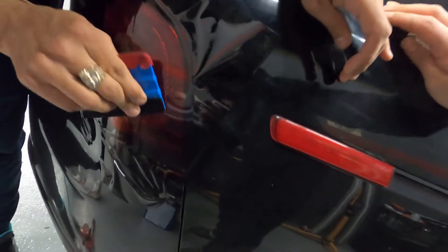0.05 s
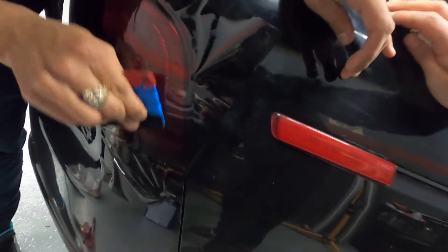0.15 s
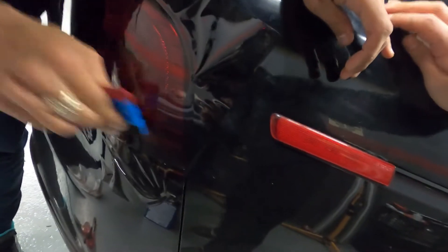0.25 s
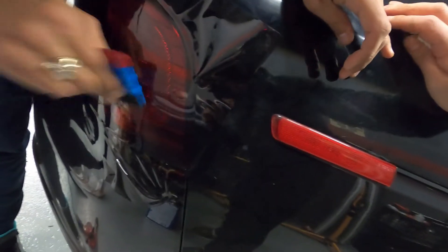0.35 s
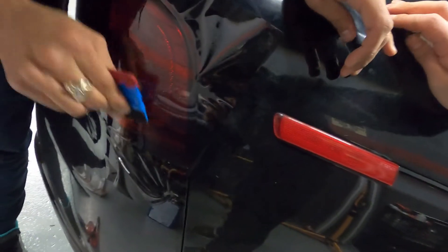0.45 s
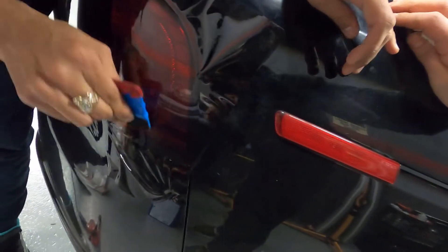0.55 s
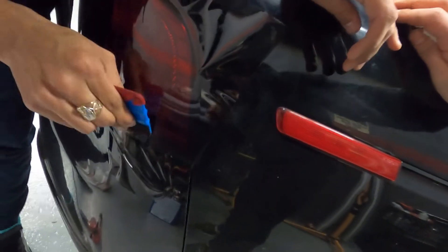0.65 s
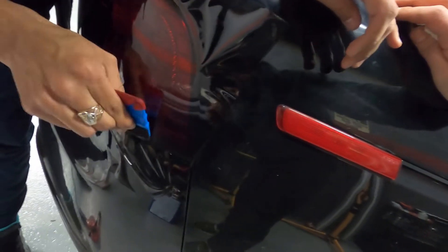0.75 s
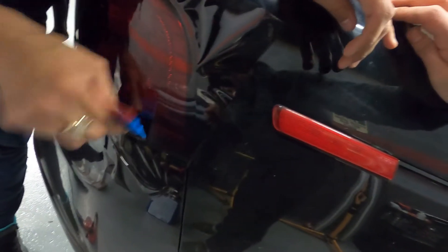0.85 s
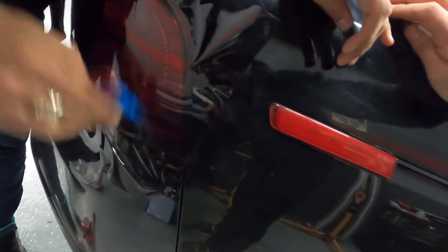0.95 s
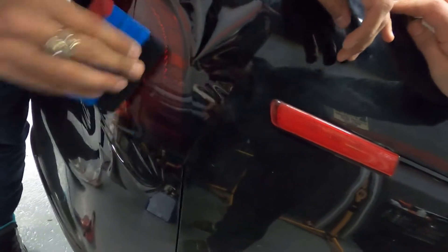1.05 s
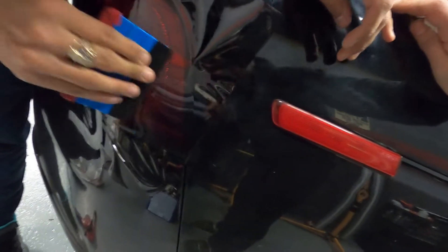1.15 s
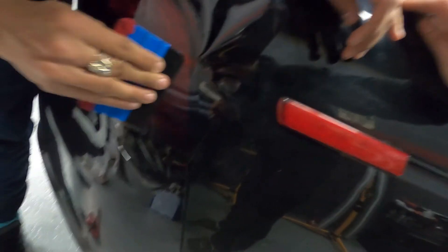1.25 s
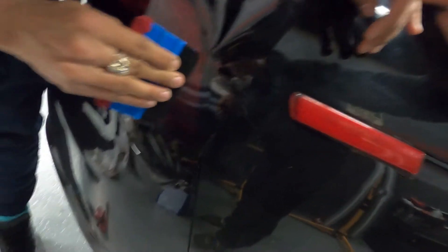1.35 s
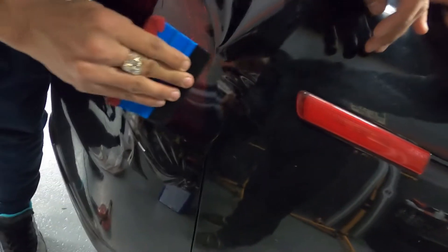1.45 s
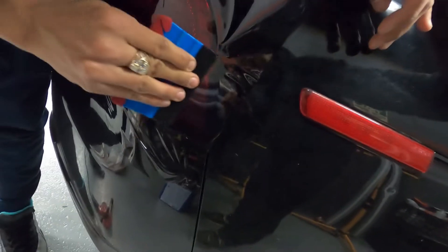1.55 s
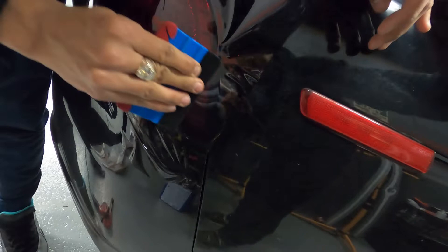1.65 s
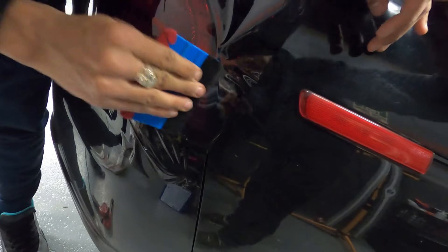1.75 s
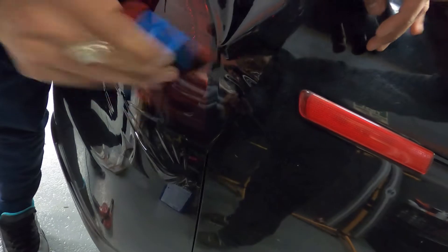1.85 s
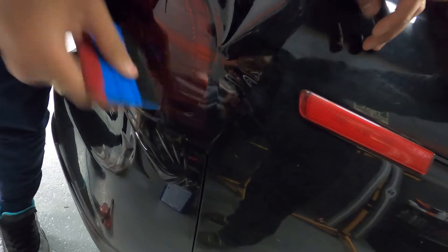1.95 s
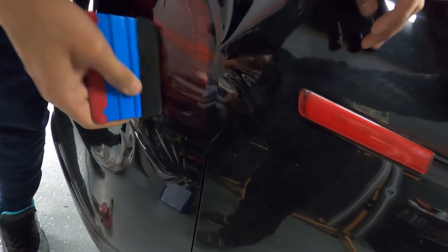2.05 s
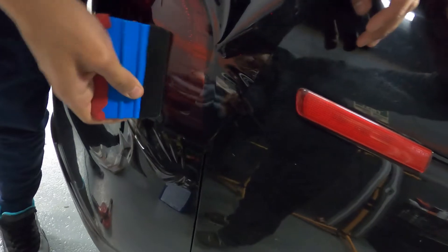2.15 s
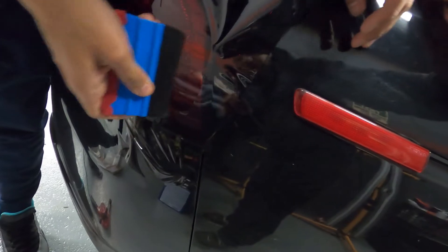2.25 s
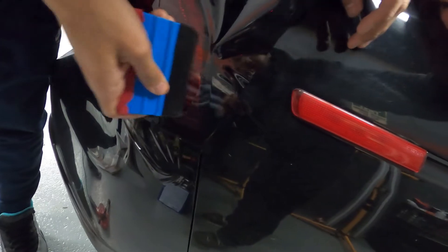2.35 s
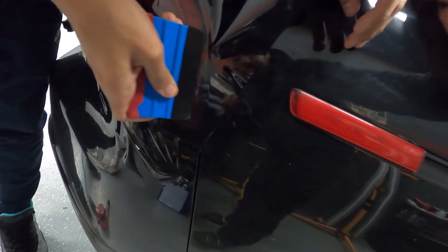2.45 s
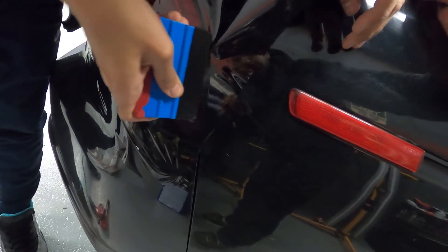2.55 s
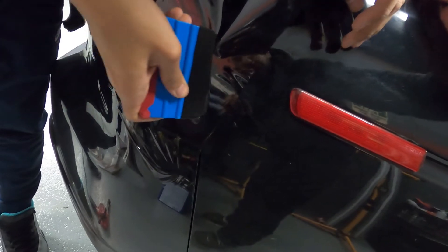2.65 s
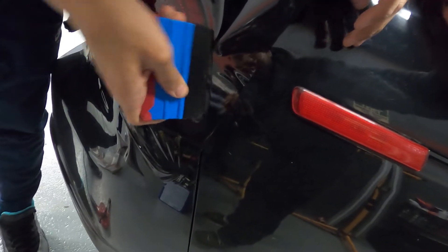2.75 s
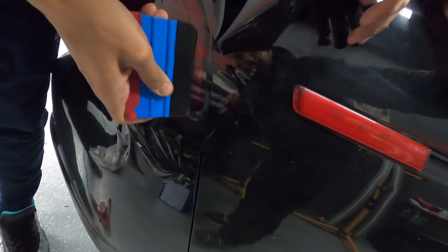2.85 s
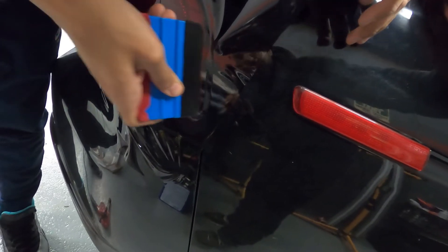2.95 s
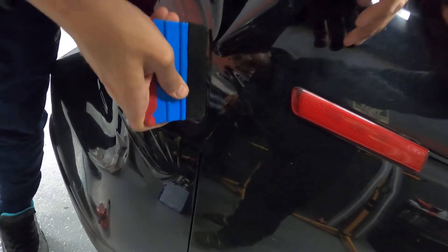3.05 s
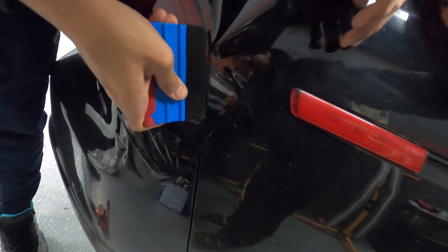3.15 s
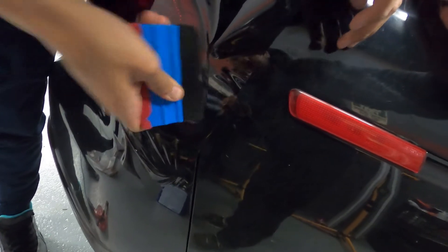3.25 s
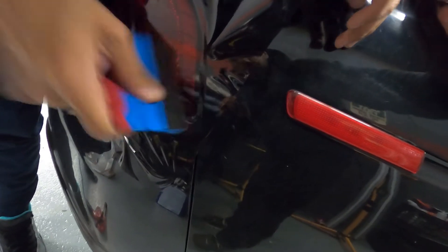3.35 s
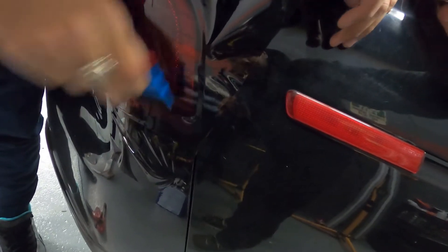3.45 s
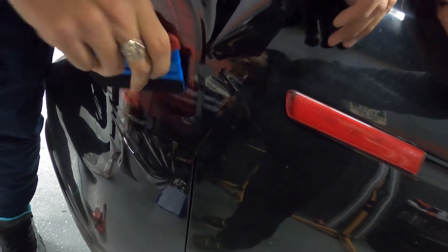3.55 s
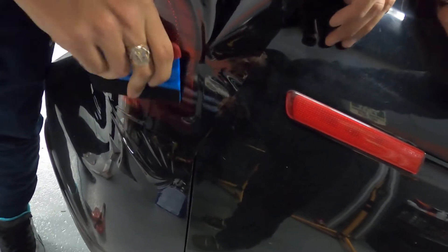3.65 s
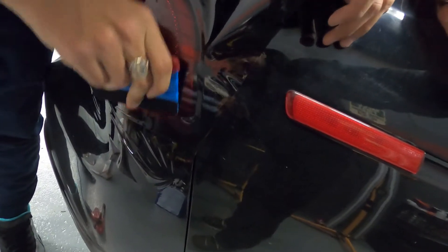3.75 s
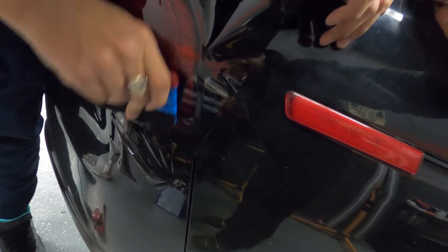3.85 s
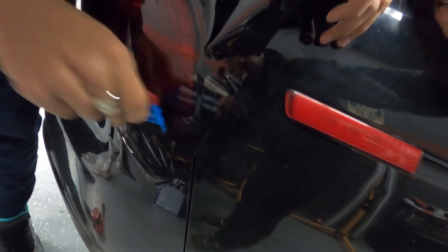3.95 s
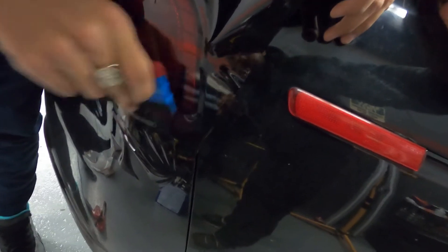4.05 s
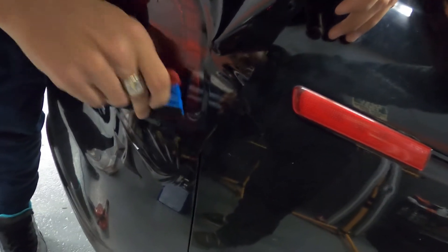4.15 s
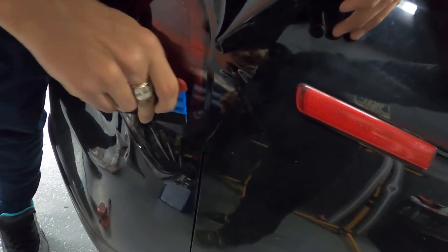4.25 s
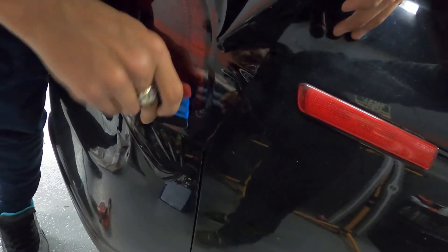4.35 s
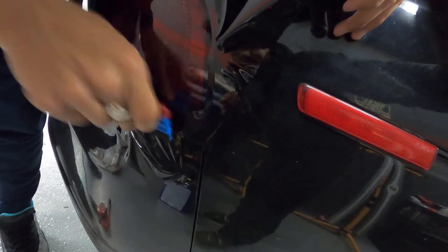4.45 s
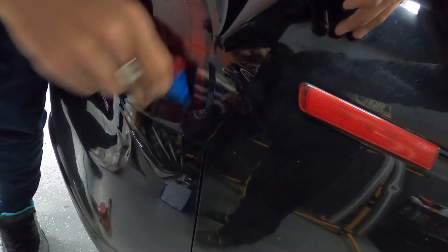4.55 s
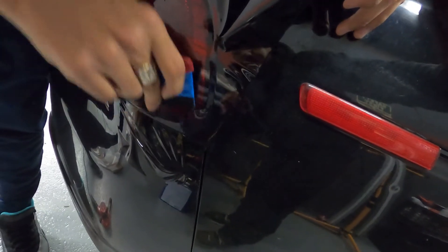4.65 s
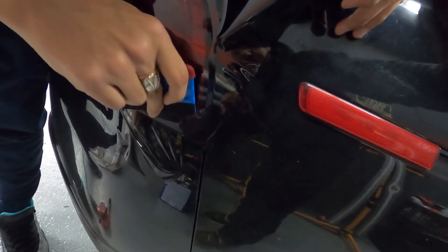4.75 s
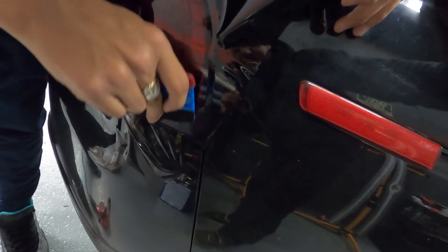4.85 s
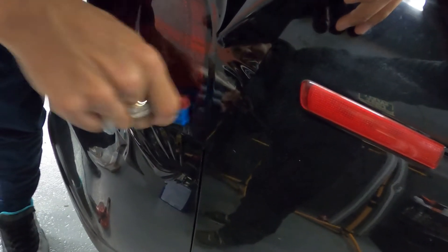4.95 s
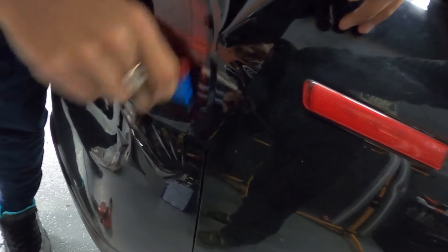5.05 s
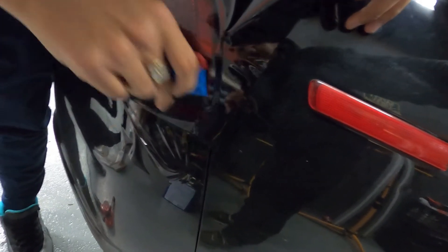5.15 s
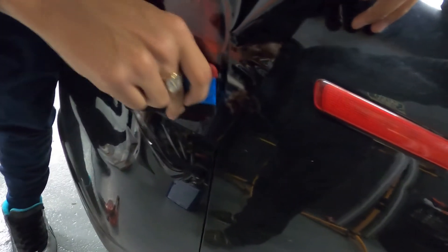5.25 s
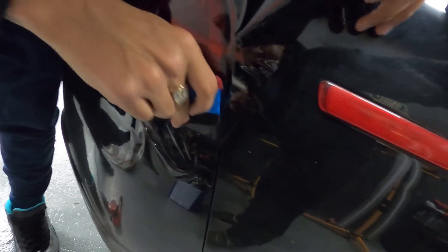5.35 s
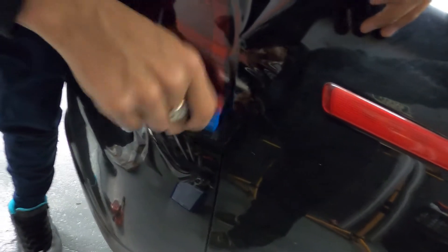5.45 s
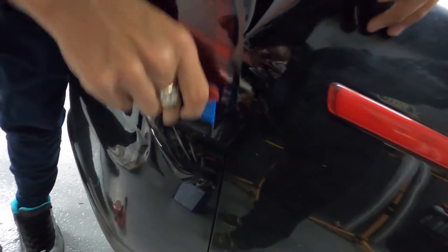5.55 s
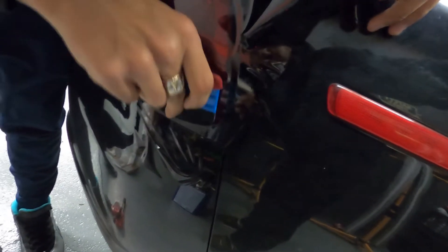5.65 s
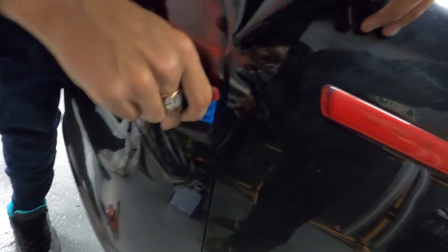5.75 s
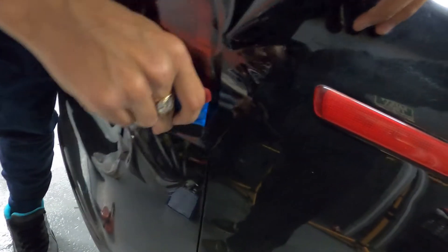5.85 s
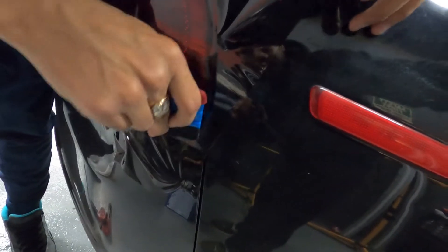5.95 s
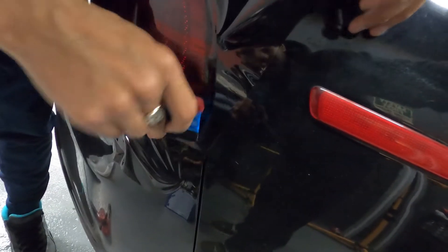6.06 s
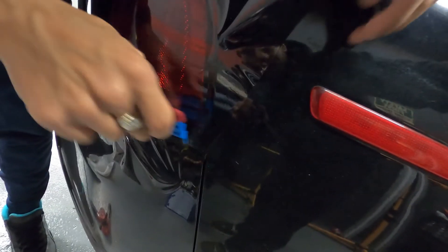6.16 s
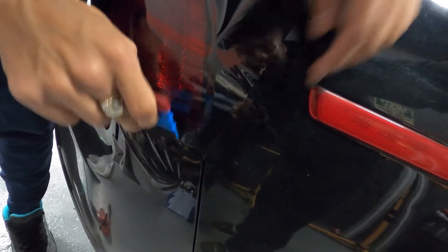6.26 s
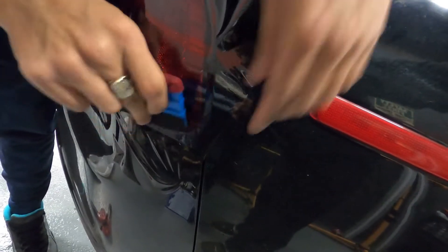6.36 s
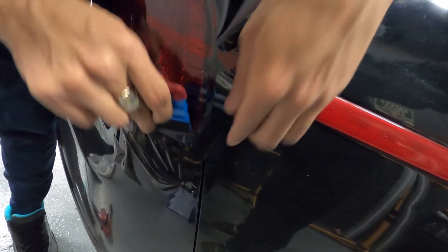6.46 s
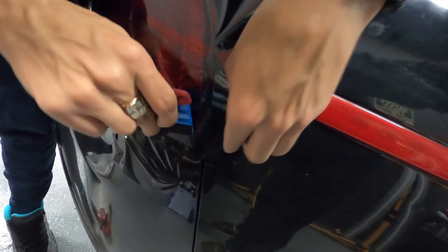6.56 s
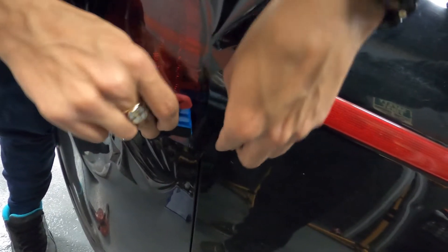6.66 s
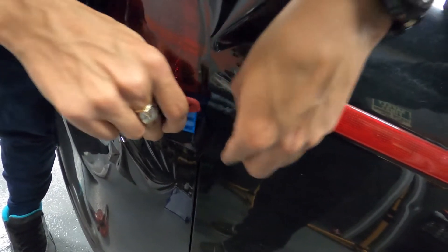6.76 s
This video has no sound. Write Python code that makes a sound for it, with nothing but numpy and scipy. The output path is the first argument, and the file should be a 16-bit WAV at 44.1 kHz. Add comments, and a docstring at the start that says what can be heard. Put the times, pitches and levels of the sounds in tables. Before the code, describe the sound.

Irregular knocks on a hollow car lamp start immediately, with a loud one at half a second. Faint felt strokes, cloth rustle and light ticking follow, then more separated medium knocks. The last stretch is loudest, with two hard, bright snapping cracks and a busy scrape and clatter before settling. Close stereo pickup in a quiet garage, with low hum, soft body bumps and little reverberation.

```python
"""Knocks at once, then scattered knocks, ticks, snaps and strokes over almost seven seconds of low room hum.
A squeegee blade works vinyl film on a car lamp in a quiet garage, close to the ports of a two-port camera.
Knocks, thumps and film snaps are struck modes; a slipping blade judders; strokes rub, swish and hiss,
a sleeve rustles and the hands bump the car body, all as coloured noise under swelling levels.
A sparse-tap tail gives the garage."""
import sys
import numpy as np
from scipy import signal
from scipy.fft import rfft, irfft, next_fast_len
from scipy.io import wavfile
from scipy.ndimage import uniform_filter1d

SR = 44100
rng = np.random.default_rng(int(sys.argv[2]) if len(sys.argv) > 2 else 0)


def undo_db(level):
    """Turn decibels back into plain size, where 20 dB means ten times bigger."""
    steps = np.asarray(level, float) / 20
    return 10 ** steps


def to_wav(s):
    """Save 16-bit WAV."""
    ch = np.atleast_2d(s).T  # columns
    pcm = np.round(np.clip(ch, -1, 1) * 32767)  # PCM
    wavfile.write(sys.argv[1], SR, pcm.astype(np.int16))


N = 299649

# Spectra of the noise layers; only the shape counts: pitch_hz, density_db (relative, per Hz)
HUM_SPECTRUM = [(47, -58.5), (80, -51), (140, -2.5), (232, 2.5), (270, -6.5), (311, -4.5), (373, -14.5),
                (565, -21.5), (900, -32), (1170, -25), (1980, -120)]
RUMBLE_SPECTRUM = [(15, -15), (30, 2), (65, -1), (105, -12), (150, -45)]
RUB_SPECTRUM = [(240, -33.5), (400, -6.5), (524, -26), (607, -10.5), (681, -26), (1050, -7), (1500, -9),
                (2000, -13.5), (2600, -38.5), (4400, -120)]
SWISH_SPECTRUM = [(1200, -28), (1700, -3.5), (2000, -6), (2700, -6), (3500, -10.5), (5000, -17),
                  (8000, -23.5), (14000, -52)]
HISS_SPECTRUM = [(2200, -29), (3000, -10), (3500, -8.5), (4000, -6.5), (4400, -5.5), (4800, -7.5),
                 (5500, -17.5), (7000, -20), (12000, -47), (16000, -52)]
RUSTLE_SPECTRUM = [(2500, -29.5), (4000, -16.5), (5200, -1.5), (6500, 1.5), (7500, 1.5), (8800, -7),
                   (10500, -10.5), (13000, -15.5), (16000, -37.5)]
PANEL_SPECTRUM = [(200, -40), (350, -3), (500, 0), (700, -4), (1100, -40)]
# Left-right likeness of diffuse sound at the two ports: pitch_hz, likeness (0 to 1)
PORT_LIKENESS = [(60, 0.28), (180, 0.34), (550, 0.09), (1650, 0.79), (4970, 0.32), (15000, 0.18)]

# Drift of the hum in the room: time_s, level_db
HUM_DRIFT = [(0, -63), (1.05, -60), (1.4, -62), (1.65, -68), (2.1, -66), (2.25, -60), (2.65, -65),
             (2.9, -60), (3.2, -64), (3.45, -60), (4.0, -65), (4.6, -62), (5.1, -66), (6.79, -65)]
# Bumps of the hands through the car body: crest_s, level_db
HAND_BUMPS = [(0.075, -50), (0.4, -59), (0.52, -52), (0.69, -66), (0.87, -68), (1.13, -66), (1.47, -71),
              (2.0, -65), (2.2, -64), (2.42, -58), (2.5, -59), (2.68, -65), (2.91, -65), (3.14, -61),
              (3.27, -68), (3.52, -54), (3.62, -62), (4.17, -68), (4.35, -66), (4.56, -55), (4.8, -60),
              (4.9, -66), (5.87, -67), (6.235, -50), (6.405, -42), (6.445, -43), (6.56, -47)]
# Strokes of the blade, rise and fade being times for 20 dB:
# crest_s, rise_s, fade_s, lens_rub_db, felt_swish_db, edge_hiss_db
BLADE_STROKES = [(0.04, .03, .2, -50, -59, -59), (0.28, .3, .3, -65, -59, -82),
                 (0.55, .37, .2, -57, -50, -56), (0.84, .3, .3, -71, -67, -73),
                 (1.04, .15, .1, -70, -71, -72), (1.19, .12, .1, -74, -69, -75),
                 (1.36, .2, .3, -72, -69, -88), (1.5, .1, .25, -66, -70, -90),
                 (1.82, .2, .2, -74, -76, -72), (2.02, .15, .2, -74, -70, -73),
                 (2.14, .1, .18, -66, -66, -67), (2.33, .12, .2, -62, -65, -71),
                 (2.49, .2, .25, -62, -70, -70), (2.72, .25, .1, -70, -68, -75),
                 (2.9, .15, .15, -77, -76, -75), (3.1, .3, .1, -72, -74, -79),
                 (3.41, .15, .25, -70, -62, -69), (3.86, .3, .3, -75, -71, -71),
                 (4.03, .12, .12, -82, -79, -73), (4.33, .1, .3, -72, -72, -84),
                 (4.83, .1, .15, -75, -70, -75), (5.02, .15, .15, -75, -77, -76),
                 (5.33, .1, .3, -65, -72, -74), (5.48, .1, .08, -65, -77, -79),
                 (5.67, .1, .38, -53, -58, -46), (6.33, .12, .25, -54, -54, -44),
                 (6.49, .2, .12, -49, -47, -46), (6.55, .06, .07, -60, -54, -60),
                 (6.7, .2, .3, -73, -70, -63)]
# Rustles of the sleeve: crest_s, level_db, time_s for 20 dB up and again down
SLEEVE_RUSTLES = [(0.05, -69, .2), (0.52, -63, .35), (0.85, -75, .25), (1.03, -76, .15), (1.19, -70, .15),
                  (1.33, -72, .2), (1.5, -74, .25), (1.81, -73, .2), (1.91, -70, .1), (2.02, -65, .08),
                  (2.14, -62, .15), (2.3, -71, .2), (2.48, -69, .3), (2.72, -70, .12), (2.92, -74, .15),
                  (3.07, -75, .1), (3.14, -72, .06), (3.43, -66, .2), (3.74, -75, .15), (3.89, -73, .2),
                  (4.03, -70, .12), (4.25, -76, .1), (4.37, -72, .12), (4.54, -74, .1), (4.82, -80, .12),
                  (5.01, -72, .08), (5.07, -70, .1), (5.31, -75, .15), (5.44, -76, .1), (5.68, -56, .11),
                  (5.82, -66, .12), (6.32, -55, .2), (6.49, -51, .1), (6.72, -73, .25)]

# Knocks on the lamp: start_s, peak_db, thump_db, hardness_db (per octave),
# ring_hz (housing modes near it ring on), thump_hz (cavity modes near it are favoured)
LAMP_BLOWS = [(0.021, -22, -27, -9, 750, 390), (0.024, -19.5, -29.5, -6, 1330, 91.4),
              (0.032, -23.5, -25, -9.5, 900, 280), (0.5076, -9, -27.5, -4.5, 1100, 190),
              (1.228, -8.5, -26.5, -5, 950, 253), (2.111, -40, -34.5, -17.5, 500, 218),
              (2.246, -50, -41, -4, 1100, 237), (3.49, -24.5, -33.5, -21, 1000, 169),
              (3.676, -20.5, -30, -13, 1177, 209), (4.239, -14.5, -25.5, -6, 1280, 203),
              (4.548, -65, -50, -8.5, 997, 148), (4.726, -15.5, -26, -10, 1200, 196),
              (5.228, -17.5, -35.5, -3.5, 1296, 178), (5.2293, -15, -28.5, -13, 960, 204),
              (5.581, -9.5, -30, -5, 1350, 180), (5.754, -22.5, -28.5, -9, 1500, 212),
              (6.22, -17.5, -33, -1.5, 1100, 215), (6.393, -18.5, -36.5, -2.5, 1050, 219),
              (6.543, -13, -47.5, -6.5, 1055, 306), (6.606, -39, -50.5, -8, 940, 300)]
# Light ticks on the lens, thumping only softly: start_s, peak_db, ring_hz
LENS_TICKS = [(0.916, -47.5, 940), (2.394, -42, 1360), (2.416, -43, 1000), (2.438, -39, 1300),
              (2.483, -39, 1320), (2.507, -38, 1120), (2.621, -35, 1350), (2.643, -34, 1400),
              (2.66, -47, 1250), (2.678, -50, 1190), (2.736, -50, 1400), (2.832, -47, 1550),
              (6.361, -36, 1300), (6.443, -37, 1520), (6.532, -29, 1214)]
# Quick modes of the lens: pitch_hz, level_db (relative)
LENS_MODES = [(520, -8), (700, -8), (890, 2), (1100, -1), (1340, 0.5), (1550, -1), (1780, 1.5), (2250, 3),
              (2700, 8), (3500, 10), (4600, 9.5), (6200, 6), (8000, 6.5)]
# Slow modes of the lamp housing: pitch_hz, level_db (relative), t60_s
HOUSING_MODES = [(600, -4, .12), (759, -3, .18), (865, -6, .25), (907, 0, .4), (952, -4, .35),
                 (1098, -8, .15), (1206, -5, .25), (1265, -5, .3), (1342, -1, .4), (1402, -5, .3),
                 (1530, -10, .1), (1620, -10, .1), (1900, -10, .08)]
# Modes of the hollow body behind the lens: pitch_hz, level_db (relative), t60_s
CAVITY_MODES = [(62, -8, .1), (100, -6, 0.033), (147.4, -5, 0.29), (178.2, 1.5, 0.15), (209, -17.5, 0.28),
                (237, 9.5, 0.065), (298, -9, 0.087), (390, 0, 0.12)]
# Snaps of the film off the blade: start_s, peak_db, centre_hz, spread_octaves
FILM_SNAPS = [(0.0225, -26.5, 3320, 0.94), (0.698, -56, 3070, 1.3), (0.9167, -52, 3170, 1.6),
              (1.504, -29.5, 2920, 1.1), (1.5072, -38.5, 3200, 1.5), (1.638, -51, 6160, 0.43),
              (2.0118, -52, 7360, 1.3), (2.0244, -41, 5680, 1.3), (2.0394, -44, 5790, 1.5),
              (3.3698, -32, 4770, 1.57), (3.389, -45, 4270, 0.81), (4.0003, -40, 3080, 0.79),
              (5.1313, -58.5, 7370, 0.61), (5.5803, -3.5, 4150, 1.57), (6.2206, -2, 3700, 1.24),
              (6.3946, -20.5, 3130, 0.76), (6.4418, -33, 4310, 0.69), (6.5264, -31, 3320, 1.3),
              (6.5303, -36, 3540, 1.3), (6.5299, -22.5, 3050, 0.76), (6.535, -27, 3820, 1.6),
              (6.5384, -22.5, 3730, 0.83)]
# Modes of the stiff blade: pitch_hz, level_db (relative)
BLADE_MODES = [(1250, -5), (1900, -8.5), (2700, -8), (3420, -1.5), (3880, -2.5), (4420, -3.5), (5170, -3.5),
               (5600, -0.5), (6400, 3), (7300, 3.5), (8000, -5), (8700, 5.5), (10200, -16.5), (11700, -9),
               (13100, -15.5), (14800, -29.5)]
# Spells of judder while the blade is pushed: time_s, level_db, pitch_hz
JUDDER_SPELLS = [
    [(2.26, -56, 1370), (2.29, -52.5, 1360), (2.322, -93.5, 979), (2.33, -70.5, 935), (2.346, -51.5, 900),
     (2.46, -75, 1260)],
    [(2.72, -66.5, 1250), (2.738, -55, 1300), (2.77, -78, 1350)],
]

# What lingers after a hit: offset_db from the hit, delay_s to the crest, fade_s for 20 dB
HUM_AFTER_THUMP = (-21, .02, .15)
BUMP_AFTER_THUMP = (-28, .015, .07)
RUB_AFTER_BLOW = (-50, .06, .4)
HISS_AFTER_SNAP = (-50, .03, .3)
DRUM_AFTER_SNAP = (-51, .04, .16)
DRUM_AFTER_THUMP = (-22, .012, .05)

# Decay of the garage: pitch_hz, t60_s
GARAGE_DECAY = [(150, 0.7), (500, 0.36), (1000, 0.41), (2000, 0.26), (4000, 0.38), (9000, 0.086)]
# Shade of the camera body on the left port: pitch_hz, level_db
LEFT_SHADE = [(60, -.4), (500, -.9), (2000, -1), (4000, -2.5), (6000, -3), (8500, -7), (13000, -5)]
# Phase of the left port against the right, negative being later: pitch_hz, phase_radians
LEFT_PHASE = [(60, 0), (500, -.1), (1000, -.22), (2000, -.45), (4000, -1), (6600, -1.6), (9500, -1),
              (12000, -1.9), (13500, -3.5)]


def evened(x):
    """Scales to unit rms."""
    return x / np.sqrt(np.mean(x ** 2) + 1e-20)


def read(points, hz):
    """Reads a curve on a log-frequency axis."""
    f, value = np.transpose(points)
    return np.interp(np.log(hz + 1), np.log(f + 1), value)


def add(mix, s, db, part):
    """Mixes a sound in at its peak level."""
    at = round(s * SR)
    mix[at:at + len(part)] += undo_db(db) * part / abs(part).max()


def ring(hz, db, t60, rise_s, crest_s):
    """Struck modes that swell smoothly and crest as the surface springs back."""
    t = np.arange(SR // 3)[:, None] / SR
    decay = undo_db(db - 60 * t / t60)
    swell = 1 - np.exp(-(t / rise_s) ** 2)
    return (decay * np.cos(2 * np.pi * hz * (t - crest_s)) * swell).sum(1)


def noise(spectrum, size, count, patchy_db, flicker_db, wide):
    """Two ports of coloured noise with patches count bins wide and a flicker shared by all pitches."""
    frames, hz = 4 * N // size + 5, np.fft.rfftfreq(size, 1 / SR)
    a, b, c, d, patches = rng.standard_normal((frames, len(hz), 5)).T
    patches = uniform_filter1d(patches, count, 0)
    patches = evened(uniform_filter1d(patches, 14, 1))
    flicker = evened(uniform_filter1d(rng.standard_normal(frames), 4))
    same = 1 - np.clip(wide * (1 - read(PORT_LIKENESS, hz)), 0, 1)[:, None]
    left = a + 1j * b
    right = same * left + np.sqrt(1 - same ** 2) * (c + 1j * d)
    colour_db = read(spectrum, hz)[:, None] + patchy_db * patches + flicker_db * flicker
    z = np.array([left, right]) * undo_db(colour_db)
    return evened(signal.istft(z, nperseg=size, noverlap=3 * size // 4)[1][:, :N])


def swells(floor_db, *groups):
    """A steady level or curve plus swells (crest s, rise s, fade s, dB) that climb and fall evenly in dB."""
    t = np.arange(0, N / SR + .002, .002)[:, None]
    if np.ndim(floor_db):
        floor_db = np.interp(t[:, 0], *np.transpose(floor_db))
    power = undo_db(2 * floor_db)  # doubled dB: powers add
    for s, rise, fade, db in groups:
        below_db = 20 * np.where(t < s, (s - t) / rise, (t - s) / fade)
        power = power + undo_db(2 * (db - below_db)).sum(1)
    return np.interp(np.arange(N) / SR, t[:, 0], np.sqrt(power))


def after(s, db, rule):
    """The swell that lingers after hits of level db."""
    below_db, delay, fade = rule
    return s + delay, delay, fade, db + below_db


def room_hum():
    """Low hum of the room as drifting noise, with a boom that lingers after each thump."""
    s, _, thump_db = np.transpose(LAMP_BLOWS)[:3]
    level = swells(HUM_DRIFT, after(s, thump_db, HUM_AFTER_THUMP))
    return level * noise(HUM_SPECTRUM, size=2048, count=2, patchy_db=3.0, flicker_db=1.34, wide=0.5)


def body_rumble():
    """Very low noise through the car body, swelling with hand bumps and after thumps."""
    (bump_s, bump_db), (s, _, thump_db) = np.transpose(HAND_BUMPS), np.transpose(LAMP_BLOWS)[:3]
    rise_s, fade_s = .06, .065  # for 20 dB
    level = swells(-77, (bump_s, rise_s, fade_s, bump_db), after(s, thump_db, BUMP_AFTER_THUMP))
    return level * noise(RUMBLE_SPECTRUM, size=2048, count=2, patchy_db=1.5, flicker_db=3.0, wide=.1)


def lens_rub():
    """Friction noise in the colour of the lens: strokes, plus the late echo of blows."""
    s, rise, fade, rub_db, _, _ = np.transpose(BLADE_STROKES)
    blow_s, blow_db = np.transpose(LAMP_BLOWS)[:2]
    level = swells(-83, (s, rise, fade, rub_db), after(blow_s, blow_db, RUB_AFTER_BLOW))
    return level * noise(RUB_SPECTRUM, size=512, count=3, patchy_db=1.5, flicker_db=1.4, wide=.3)


def felt_swish():
    """Friction noise of the felt, nearly alike at both ports, swelling with each stroke."""
    s, rise, fade, _, swish_db, _ = np.transpose(BLADE_STROKES)
    level = swells(-82, (s, rise, fade, swish_db))
    return level * noise(SWISH_SPECTRUM, size=512, count=4, patchy_db=2.0, flicker_db=1.6, wide=0.1)


def edge_hiss(snap):
    """Friction noise in the colour of the blade edge: strokes, late echo of snaps, and film flutter."""
    s, rise, fade, _, _, hiss_db = np.transpose(BLADE_STROKES)
    snap_s, snap_db = np.transpose(FILM_SNAPS)[:2]
    # freed film flutters on after each snap, dying by 1/e in 8.5 ms
    flutter = undo_db(-5) * signal.lfilter([.002], [1, -np.exp(-1 / (SR * 0.0085))], abs(snap))
    level = swells(-87, (s, rise, fade, hiss_db), after(snap_s, snap_db, HISS_AFTER_SNAP)) + flutter
    return level * noise(HISS_SPECTRUM, size=512, count=3, patchy_db=1.2, flicker_db=.4, wide=.3)


def sleeve_rustle():
    """Patchy treble noise of the sleeve, spread between the ports like diffuse sound."""
    s, db, half = np.transpose(SLEEVE_RUSTLES)
    level = swells(-86, (s, half, half, db))
    return level * noise(RUSTLE_SPECTRUM, size=256, count=5, patchy_db=2, flicker_db=2.3, wide=1.0)


def blows():
    """Each blow knocks the lens, leaves the housing ringing and, a moment later, thumps the cavity."""
    out = np.zeros(N + SR)
    f, db = np.transpose(LENS_MODES)
    f_slow, db_slow, t_slow = np.transpose(HOUSING_MODES * 3)  # each mode a bunch of three neighbours
    f_low, db_low, t_low = np.transpose(CAVITY_MODES)
    ticks = [(s, peak_db, peak_db - 24, -13, hz, 170) for s, peak_db, hz in LENS_TICKS]
    rows = LAMP_BLOWS + ticks
    chance = rng.uniform(-1, 1, (len(rows), 2, len(f_slow)))
    for (s, peak_db, thump_db, hard_db, ring_hz, thump_hz), (detune, step) in zip(rows, chance):
        # a soft, long contact cannot drive the high modes
        octaves = np.log2(f / ring_hz)
        bright_db = hard_db * np.maximum(octaves, 0) - 14. * np.minimum(octaves, 0) ** 2
        contact_s = .00016 * undo_db(-.55 * hard_db)
        crest_s = 2.4 * contact_s + .15 * step[:len(f)] / f
        knock = -ring(f, db + bright_db, 17 / f, contact_s, crest_s)  # 17 swings lose 60 dB
        # the place of the blow picks the slow modes
        place_db = -27 - 260.0 * np.log2(f_slow / ring_hz) ** 2
        bunch_hz = f_slow * (1 + .035 * detune)
        knock += ring(bunch_hz, db_slow + place_db, t_slow, 0.0018, step / f_slow)
        add(out, s + .0006, peak_db, knock)
        near_db = -20.8 * np.log2(f_low / thump_hz) ** 2
        add(out, s + .0035, thump_db, ring(f_low, db_low + near_db, t_low, .004, 0.0018))
    return out[:N]


def snaps():
    """The film peels off along the edge, so the blade modes start out of step."""
    out = np.zeros(N + SR)
    f, db = np.transpose(BLADE_MODES)
    steps = rng.random((len(FILM_SNAPS), len(f)))
    for (s, peak_db, hz, spread), step in zip(FILM_SNAPS, steps):
        near_db = -6 * (np.log2(f / hz) / spread) ** 2
        snap = ring(f, db + near_db, 36 / f, 0.000095, step / f)  # 36 swings lose 60 dB
        add(out, s + 0.001, peak_db, snap)
    return out[:N]


def garage(x):
    """Sparse random-sign taps, each band dying at its own speed; three tails take slow turns, varying the colour."""
    taps = np.zeros((6, SR))  # three tails for the left port, then three for the right
    at = np.arange(120, SR - 20, 20) + rng.integers(0, 20, (6, (SR - 121) // 20))
    np.put_along_axis(taps, at, rng.choice([-1., 1.], at.shape), 1)
    taps[3:] = 0.58 * taps[:3] + 0.12 * taps[3:]  # right: quieter and mostly alike
    hz, t, z = signal.stft(taps, SR, nperseg=256)
    decay = undo_db(-60 * t / read(GARAGE_DECAY, hz)[:, None])
    tails = signal.istft(z * decay, SR, nperseg=256)[1]
    tails[:, :120] = 0
    tails = tails / np.linalg.norm(tails[0])
    phase = np.arange(N) / SR / 1.7 + np.arange(3)[:, None] / 3
    turns = np.cos(np.pi * phase) * np.sqrt(2 / 3)  # the three powers sum to one
    wet = signal.fftconvolve(np.tile(x * turns, (2, 1)), tails, axes=1)[:, :N]
    return wet.reshape(2, 3, N).sum(1)


def panel_drumming():
    """Drumming of the body panel: a band of noise that swells after thumps and snaps."""
    s, _, thump_db = np.transpose(LAMP_BLOWS)[:3]
    snap_s, snap_db = np.transpose(FILM_SNAPS)[:2]
    level = swells(-95, after(snap_s, snap_db, DRUM_AFTER_SNAP), after(s, thump_db, DRUM_AFTER_THUMP))
    return level * noise(PANEL_SPECTRUM, size=1024, count=2, patchy_db=2.0, flicker_db=1.5, wide=.3)


def judder():
    """Dense uneven slips of the pushed blade, each a click into a short resonance that wanders."""
    out = np.zeros(N)
    for rows in JUDDER_SPELLS:
        s, db, hz = np.transpose(rows)
        t = np.arange(s[0], s[-1], 1 / SR)
        sizes = undo_db(2.4 * np.minimum(rng.exponential(1, len(t)), 4))
        slips = sizes * (rng.random(len(t)) < 300 / SR)  # about 300 slips a second
        # filter around zero pitch, then turn up to the wandering pitch
        turn = np.exp(2j * np.pi * np.cumsum(np.interp(t, s, hz)) / SR)
        r = np.exp(-np.pi * 700 / SR)
        voiced = (turn * signal.lfilter([1], [1, -2 * r, r * r], (slips - slips.mean()) / turn)).real
        level = undo_db(np.interp(t, s, db)) * signal.windows.tukey(len(t), .15)
        out[round(s[0] * SR):][:len(t)] += level * evened(voiced)
    return out


def scene():
    """Hits alike at both ports, their garage tail, and the noise layers around them."""
    snap = snaps()
    hits = blows() + snap + judder()
    steady = room_hum() + body_rumble()
    strokes = lens_rub() + felt_swish() + edge_hiss(snap)
    return hits + undo_db(-15.5) * garage(hits) + panel_drumming() + strokes + sleeve_rustle() + steady


def low_pass(x):
    """Removes everything above the highest recorded frequency."""
    return signal.sosfilt(signal.butter(12, 16510, fs=SR, output="sos"), x)


def record(dry):
    """The left port lies later and shaded; block-wise filtering leaks dull copies one and two blocks early."""
    size = next_fast_len(N + 2048)
    hz = np.fft.rfftfreq(size, 1 / SR)
    block = np.exp(2j * np.pi * hz * 512 / 48000)  # one block early: 512 samples at 48 kHz
    dulling = 1 + (hz / 4500) ** 4
    leak = 1 + (undo_db(-22.5) * block + undo_db(-36.5) * block ** 2) / dulling
    left = undo_db(read(LEFT_SHADE, hz)) * np.exp(1j * read(LEFT_PHASE, hz))
    ports = rfft(dry, size) * leak * np.array([left, np.ones_like(left)])
    x = irfft(ports, size)[:, :N]
    x = x / (1 + (x / .92) ** 6) ** (1 / 6)  # the input stage rounds off the loudest peaks
    return low_pass(x)


dry = scene()
out = record(dry)
to_wav(out)
```